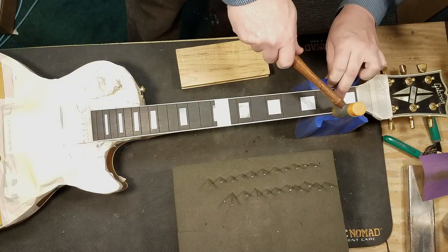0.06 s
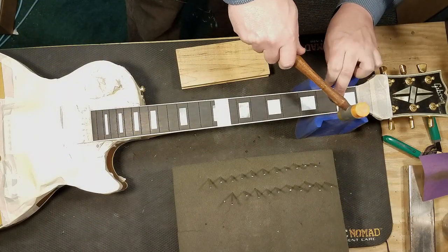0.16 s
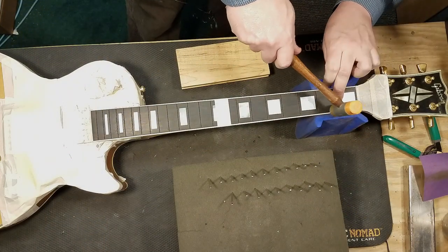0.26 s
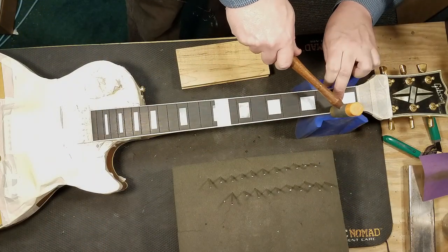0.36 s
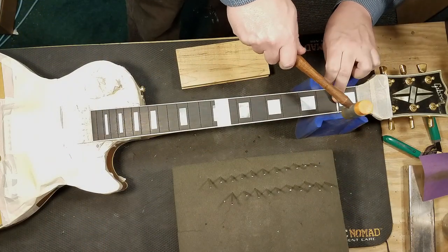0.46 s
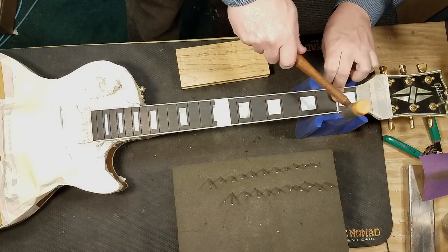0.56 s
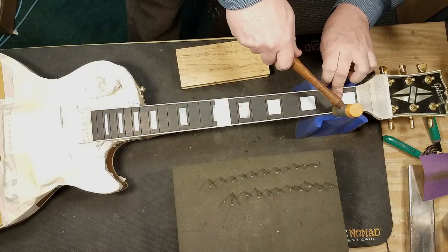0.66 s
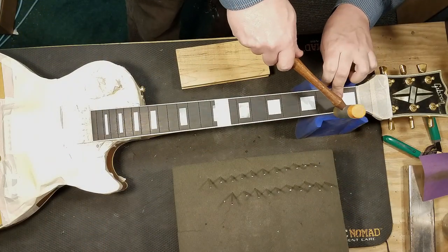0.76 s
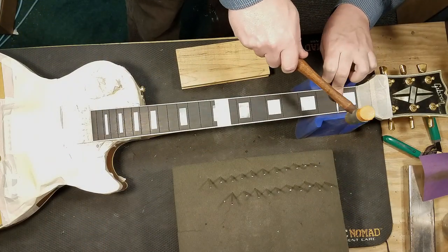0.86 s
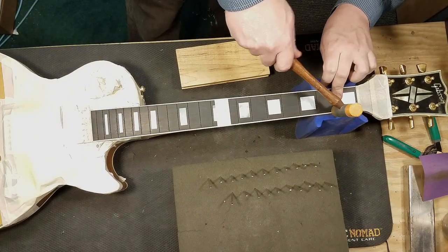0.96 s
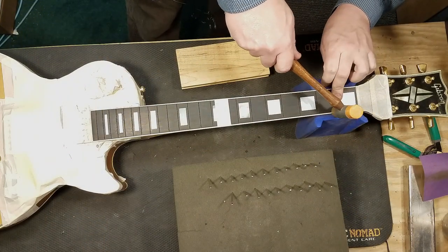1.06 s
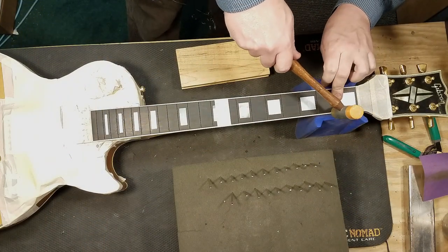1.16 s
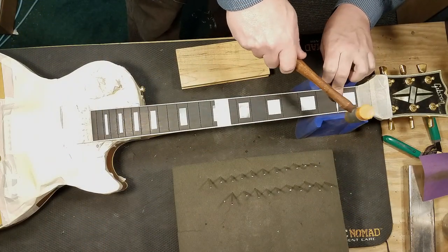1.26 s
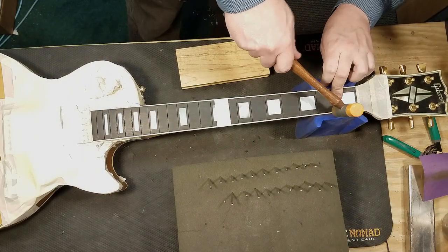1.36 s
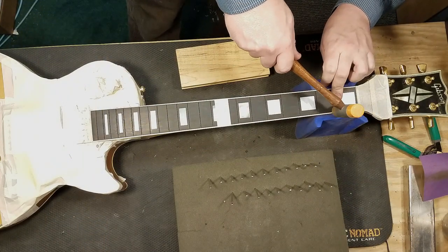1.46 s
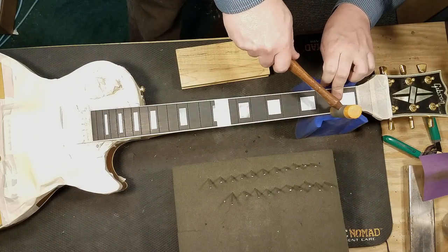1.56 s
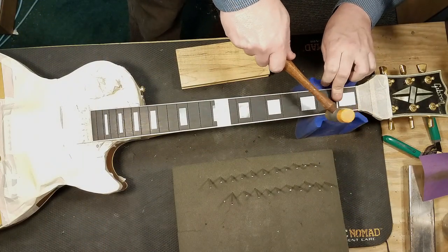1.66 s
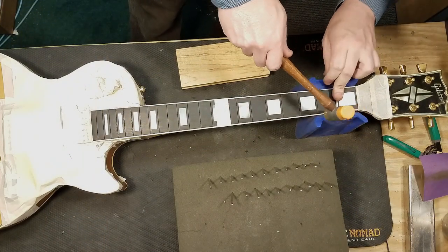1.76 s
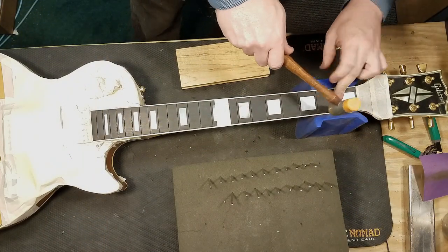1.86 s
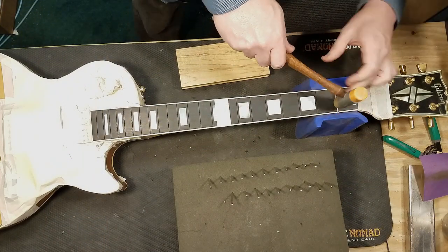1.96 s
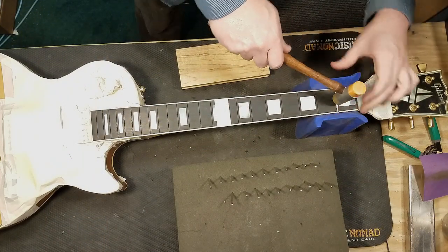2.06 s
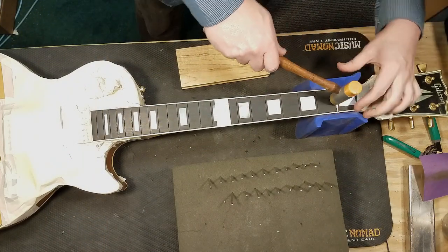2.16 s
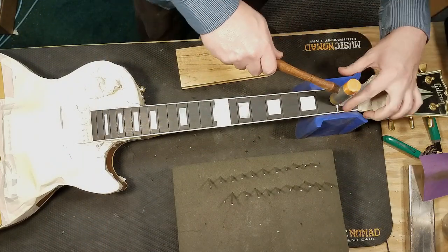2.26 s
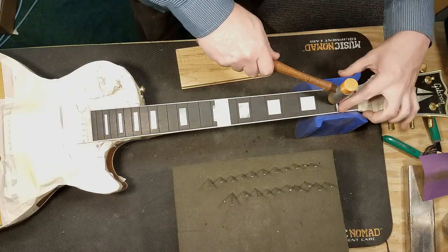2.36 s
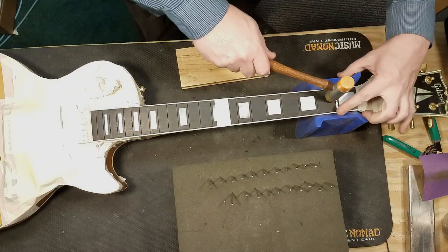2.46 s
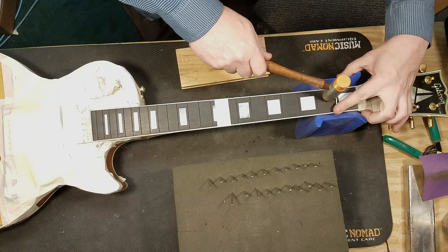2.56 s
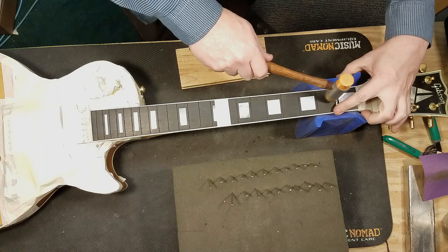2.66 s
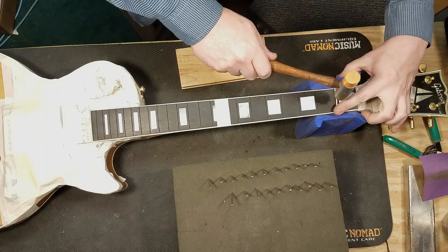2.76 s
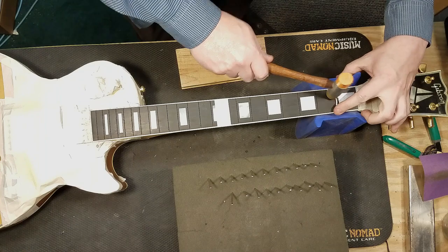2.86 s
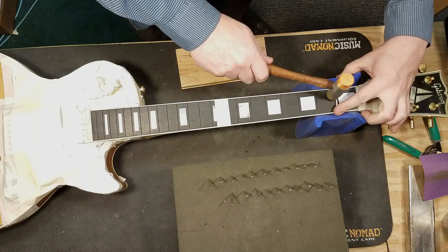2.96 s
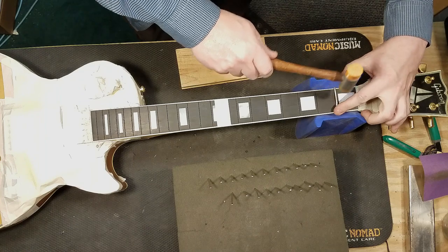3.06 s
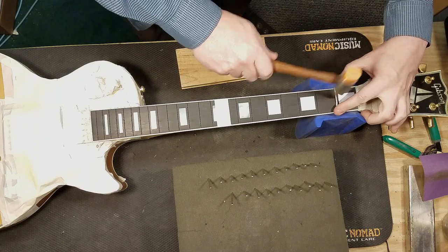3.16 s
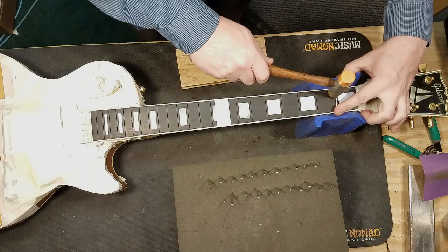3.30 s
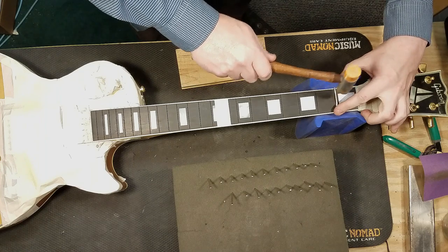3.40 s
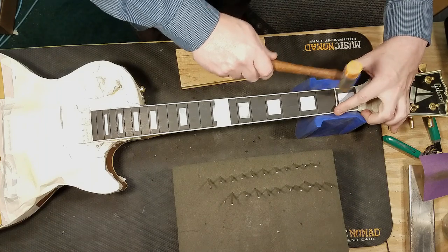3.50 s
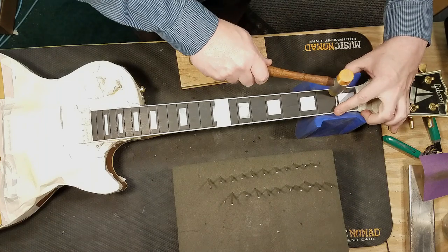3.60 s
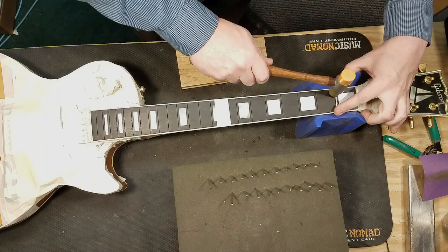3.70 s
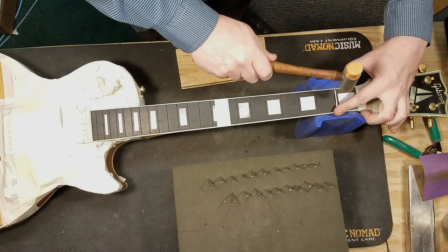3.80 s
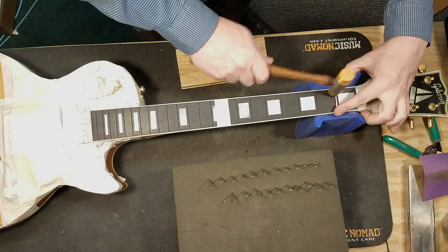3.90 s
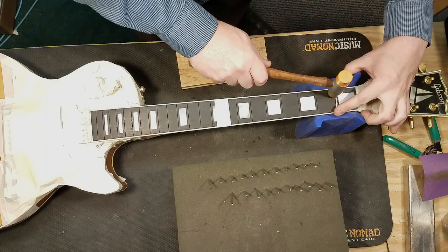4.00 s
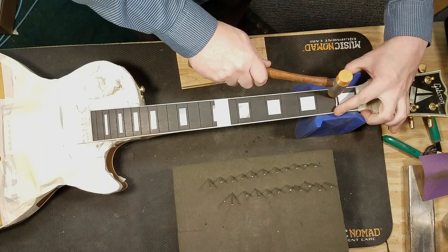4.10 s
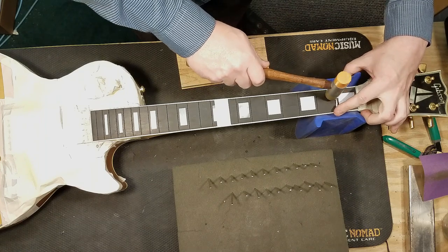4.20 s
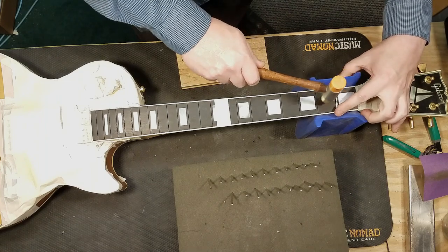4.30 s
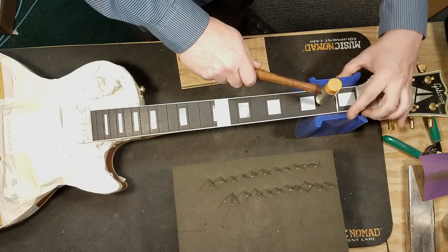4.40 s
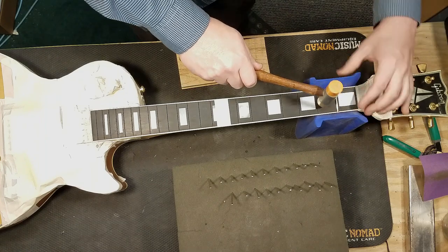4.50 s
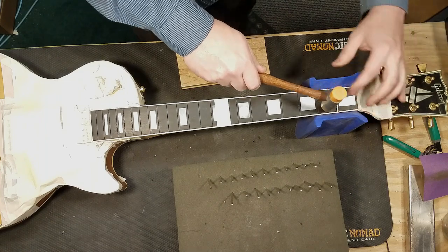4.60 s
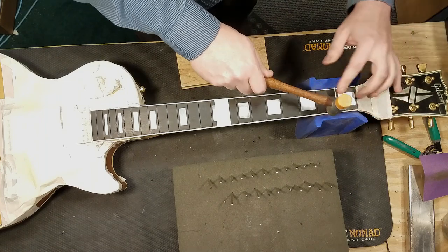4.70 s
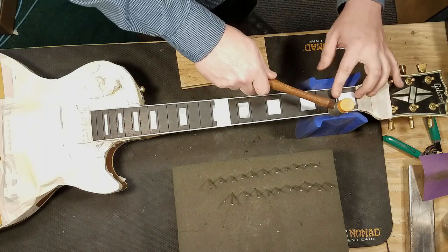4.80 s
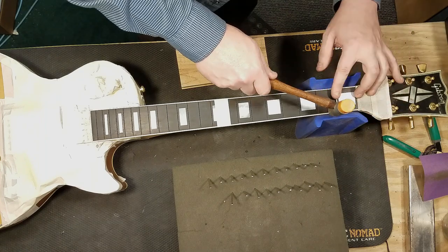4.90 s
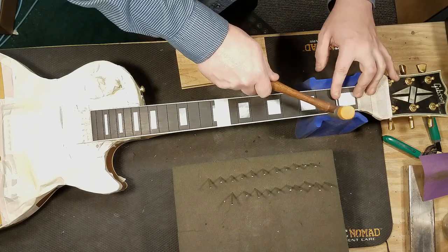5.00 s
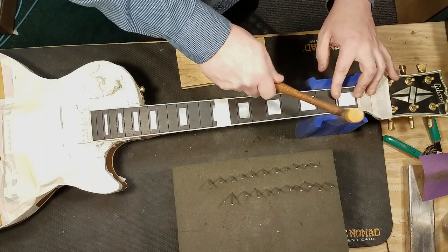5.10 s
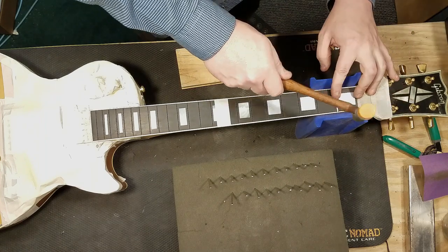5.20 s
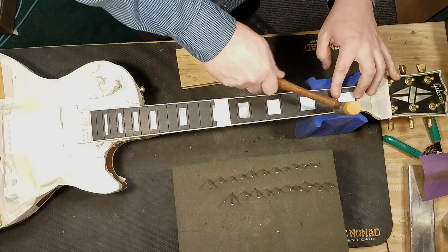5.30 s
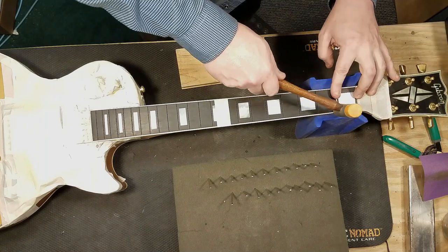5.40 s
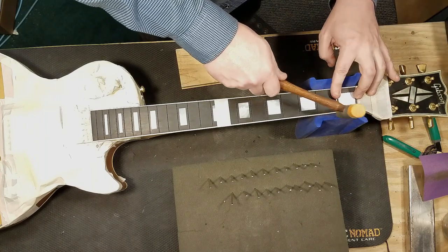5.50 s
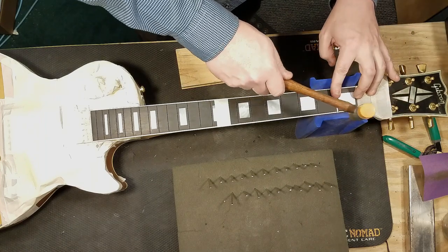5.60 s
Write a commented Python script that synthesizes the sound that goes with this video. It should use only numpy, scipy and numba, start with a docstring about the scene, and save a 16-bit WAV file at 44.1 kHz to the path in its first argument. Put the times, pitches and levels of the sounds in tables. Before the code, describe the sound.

A small brass hammer taps fret wire into a guitar neck, dry woody knocks with metallic ticks in loose runs, in a quiet small workshop.

```python
"""A small, dry workshop, where a small brass hammer taps fret wire into a guitar neck on a padded bench.
Each blow is a noisy tick on the wire, a knock of decaying sine modes in neck and bench, and room echoes of
filtered noise. Between blows come soft bumps and scuffs, made of short noise bands. Behind it all lie
a faint hiss and rumble of shaped noise and a fan's hum of two wavering sines."""
import sys
import numpy as np
from scipy import signal
from scipy.fft import rfft, irfft, next_fast_len
from scipy.io import wavfile
from scipy.ndimage import uniform_filter1d
from numba import njit

SR = 44100
rng = np.random.default_rng(int(sys.argv[2]) if len(sys.argv) > 2 else 0)


def unload_wav(signal):
    """Save mono or channel-first audio to the path in sys.argv[1] as 16-bit WAV at rate SR, clipped to [-1, 1]."""
    wavfile.write(
        sys.argv[1],
        SR,
        np.round(np.clip(np.atleast_2d(signal).T, -1, 1) * 32767).astype(np.int16),
    )


N = 249161  # length in samples

# Colour of the background air. Each row: frequency in Hz, relative spectral level in dB.
AIR_SPECTRUM = [(12, -36.5), (20, -5), (48, -7), (79, -14.5), (113, -9.5), (138, -7), (410, -16),
                (472, -24), (542, -14), (825, -17.5), (1190, -17), (1860, -25.5), (2320, -27), (8410, -48),
                (16000, -63)]
# Broad resonances of the hiss. Each row: centre in Hz, spread to either side in Hz, boost in dB.
AIR_RESONANCES = [(2635, 140, 0.5), (3150, 720, 2), (4580, 210, 5.5)]
# Partials of the fan's hum. Each row: mean frequency in Hz, relative level in dB.
FAN_PARTIALS = [(113., -2.5), (226., -10)]
# Hammer or finger brushing the neck. Each row: start in seconds, level in dB, centre in Hz,
# filter width in Hz, length in seconds (a quarter of the 60 dB decay).
BRUSHES = [(1.8, -70, 8450, 4000, 0.011), (2.01, -69, 9000, 2520, 0.011),
           (2.478, -67.5, 9500, 2500, 0.0087), (4.187, -38.5, 1000, 800, 0.0095),
           (4.2, -36, 1080, 900, 0.011), (4.37, -66.5, 8700, 1500, .006), (4.758, -39, 1180, 800, 0.0061),
           (5.038, -45, 533, 249.3, 0.046)]
# Hammer blows. Each row: start in seconds, level in dB, hardness of the tick in dB,
# spot across the neck from 0 (near edge) to 1 (far edge).
HAMMER_BLOWS = [(0.2992, -2.5, -13.5, 0.093), (0.639, -1, -12.5, 0.059), (1.003, -0.5, -12, 0.1),
                (1.4, -0.5, -12, 0.3), (2.173, -16, -17.5, 0.32), (2.609, -11, -31.5, 0.99),
                (2.903, -0.97, -20.5, 0.9), (3.222, 0.56, -19.5, 0.82), (3.5654, 1.4, -18, 0.77),
                (3.939, 1.14, -17.5, 0.97), (4.8383, -15.5, -16, 0.85), (5.335, 1.5, -17.5, 0.58)]
# Modes of neck and bench. Each row: nominal frequency in Hz, relative level in dB when struck at the near edge,
# relative level in dB when struck at the far edge, 60 dB decay in seconds.
NECK_MODES = [(44.3, -15.5, -26.5, 0.57), (74.9, -15.5, -21.5, 0.43), (104.4, -6, -1.5, 0.31),
              (129.6, -16, -11, 0.39), (168.3, -10.5, -3, 0.25), (278.2, -11, -22.5, 0.4),
              (350.4, -8, -17.5, 0.3), (377.7, -6.5, -5, 0.24), (500, -15, -22, 0.37),
              (546.3, -5, -0.5, 0.2), (573.4, 3.5, -12.5, 0.2), (599, 9.5, 3.5, 0.027),
              (635, -12, -5.5, 0.097), (765, -3, -10, 0.27), (784, -20, -1, 0.28), (817, 7.5, 7.5, 0.017),
              (835.3, -3.5, -0.5, 0.25), (849, -8, -1.5, 0.075), (968, 11.5, 8.5, 0.021),
              (965, 3.5, -4, 0.18), (1066, 1, 3, 0.13), (1087, -23.5, -2.5, 0.21),
              (1206.5, -7.5, -2.5, 0.21), (1247, -8, 9.5, 0.068), (1303.6, -4, 10, 0.074),
              (1362.5, -18, 2, .18), (1401, -10.5, -0.5, 0.19), (1470, -20.5, -18, 0.31),
              (1650, -14, -19.5, 0.25), (1906, -6, -21, 0.091)]
# Resonances of brass on wire. Each row: centre in Hz, filter width in Hz, relative level in dB.
WIRE_RESONANCES = [(1878, 1300, -1.5), (2479, 850, 11), (3100, 490, 12.5), (4130, 1400, 10.5),
                   (5690, 1080, 3), (7040, 2900, 0), (11600, 4600, -19)]
# First echoes of thud and tick. Each row: delay in seconds from the near edge,
# delay in seconds from the far edge, level in dB.
FIRST_ECHOES = [(.0021, .003, -5.5), (.0062, .0085, -33.5), (0.015, .017, -16)]
# The room's wash of echoes. Each row: band centre in Hz, relative level in dB, 60 dB decay in seconds.
ROOM_BANDS = [(65.6, -24.5, 0.32), (131.5, -24, 0.3), (273.6, -23.5, 0.39), (555.3, -16.5, 0.26),
              (835, -12.5, 0.22), (1316, -20, 0.16), (1960, -27, 0.11), (2695, -30, 0.098),
              (4390, -35.5, 0.13), (6770, -35.5, 0.081), (10020, -47, 0.074), (13920, -52, 0.078)]

AIR_START_DB, AIR_END_DB, AIR_SETTLE_S = -23.5, -29, 1.8  # the hiss sinks and settles
RUMBLE_SWELL_DB = 2
FAN_DB, FAN_SWELL_DB = -59.5, 2
BENCH_NEAR_DB, BENCH_FAR_DB = 5, -6  # the bench thumps most when the near edge is struck
THUD_NEAR_DB, THUD_FAR_DB, THUD_PER_DB = 2, -2, -0.6  # more thud at the near edge and in a light blow
ROOM_DB, ROOM_PER_DB = 1, 0.1  # a light blow sounds drier
SHARED_WASH = 0.9  # part of the echo noise that repeats from blow to blow
DEAD_T60_S = 0.07  # modes that die faster than this make the thud
TOP_HZ = 16200  # upper edge of the sound


def undb(db):
    """Decibels to gain."""
    return 10 ** (np.asarray(db) / 20)


def band(x, hz, width):
    """Resonant band-pass, gain 1 at the centre."""
    return signal.lfilter(*signal.iirpeak(min(hz, SR / 2.2), hz / width, fs=SR), x)


def unit(x):
    """Scales to rms 1."""
    return x / np.sqrt(np.mean(x ** 2))


def fade(t, t60, rise):
    """Swells over rise seconds and dies by 60 dB in t60."""
    return (1 - np.exp(-t / rise)) * np.exp(-np.log(1000) * t / t60)


def add(out, x, s):
    """Mixes x into out from time s."""
    i = int(s * SR)
    out[i:i + len(x)] += x[:N - i]


def walk(rate):
    """Random drift: levels held 1 / rate seconds and slewed twice."""
    k = int(SR / rate)
    steps = np.repeat(rng.standard_normal(N // k + 1), k)
    return uniform_filter1d(uniform_filter1d(steps, k), k)[:N]


def air():
    """Hiss and rumble: shaped noise in crossfaded half-octave bands that each flicker a little."""
    size = next_fast_len(N)
    t = np.arange(N) / SR
    f = np.arange(size // 2 + 1) * SR / size + 1  # 1 Hz up, to keep the logarithm finite
    hz, db = np.transpose(AIR_SPECTRUM)
    colour_db = np.interp(np.log(f), np.log(hz), db)
    for centre, spread, boost_db in AIR_RESONANCES:
        colour_db = colour_db + boost_db * np.exp(-((f - centre) / spread) ** 2)
    noise = rfft(rng.standard_normal(size)) * undb(colour_db)
    rumble_db = RUMBLE_SWELL_DB * walk(1.5)
    out = 0
    for octave in np.arange(4, 14.5, .5):
        share = np.clip(1 - 2 * abs(np.log2(f) - octave), 0, 1)
        swell_db = rumble_db / (1 + (2 ** octave / 450) ** 2)  # the lows swell together
        flicker_db = 1.9 * walk(4.035)
        out = out + undb(flicker_db + swell_db) * irfft(noise * share, size)[:N]
    level_db = AIR_END_DB + (AIR_START_DB - AIR_END_DB) * np.exp(-t / AIR_SETTLE_S)
    return out * undb(level_db)


def fan():
    """The fan's hum: sines whose pitch and level waver at random."""
    hum = 0
    for hz, db in FAN_PARTIALS:
        level = np.sqrt(2) * undb(db + 4 * walk(9))
        phase = 2 * np.pi * np.cumsum(hz + 3 * walk(6)) / SR
        hum = hum + level * np.sin(phase)
    return hum * undb(FAN_DB + FAN_SWELL_DB * walk(2.7))


def touches():
    """Soft bumps on the wood and faint scuffs of skin and sleeve, as short swells of band-passed noise."""
    out, t = np.zeros(N), np.arange(SR // 4) / SR
    for s, db, hz, width, length in BRUSHES:
        grain = band(rng.standard_normal(len(t)), hz, width)
        grain = unit(band(grain, hz, width))
        swell = fade(t, 4 * length, 0.18 * length) * grain
        add(out, undb(db) * band(swell, hz, 2 * width), s)
    return out


def wash(t, noise):
    """Dense room echoes, each band with its own decay; the lows build up last."""
    out = 0
    for hz, db, t60 in ROOM_BANDS:
        width = 0.59 * hz
        grain = unit(band(band(noise, hz, width), hz, width))
        out = out + undb(db) * fade(t, t60, 0.00063 + 0.5 / hz) * grain
    return out


def early(x, spot):
    """The first echoes, from bench top, guitar body and wall, timed by the spot struck."""
    out = np.zeros(len(x))
    for near_s, far_s, db in FIRST_ECHOES:
        add(out, undb(db) * x[:len(x) // 2], near_s + spot * (far_s - near_s))
    return out


def knock(t, spot, bench_db, wobble):
    """Modes of neck and bench, one row each: the spot sets their balance, long or low ringing builds up slowly."""
    hz, near_db, far_db, t60 = np.transpose(NECK_MODES)[:, :, None]
    db = near_db + spot * (far_db - near_db)
    db = db + 0.9 * wobble[:, :1]  # no two blows excite the modes alike
    db = db + bench_db / (1 + (hz / 250) ** 4)  # the bench acts on the lows
    rise = 0.022 * t60 + (7.7 / hz) ** 2
    hz = hz * (1 + .003 * wobble[:, 1:])
    return undb(db) * fade(t, t60, rise) * np.sin(2 * np.pi * hz * t)


def tick(t, tick_db):
    """An instant contact and a short rattle of the wire; a softer contact loses the treble first."""
    rattle = rng.standard_normal(len(t)) * np.exp(-t / 0.0026) * undb(-4.5)
    rattle[0] += 2  # the contact itself
    out = 0
    for hz, width, db in WIRE_RESONANCES:
        hardness_db = (tick_db + 19.0) * min(hz / 4500, 1)
        ring = band(band(rattle, hz, width), hz, 2 * width)
        out = out + undb(db - 23.5 + hardness_db) * ring
    return out


def hammer():
    """Blows of tick, thud, ring and echoes; the walls stay put, so most of the wash repeats."""
    out, t = np.zeros(N), np.arange(SR * 2 // 5) / SR
    walls = rng.standard_normal(len(t))
    dead = np.transpose(NECK_MODES)[3] < DEAD_T60_S
    for s, db, tick_db, spot in HAMMER_BLOWS:
        bench_db = BENCH_NEAR_DB + spot * (BENCH_FAR_DB - BENCH_NEAR_DB)
        thud_db = THUD_NEAR_DB + spot * (THUD_FAR_DB - THUD_NEAR_DB) + THUD_PER_DB * db
        fresh = rng.standard_normal(len(t))
        echoes = wash(t, SHARED_WASH * walls + np.sqrt(1 - SHARED_WASH ** 2) * fresh)
        # a harder contact and a heavier blow brighten the echoes
        bright = signal.lfilter(*signal.butter(2, 3300, "high", fs=SR), echoes)
        bright_db = 0.71 * (tick_db + 24) + 0.31 * db
        echoes = echoes + (undb(bright_db) - 1) * bright
        modes = undb(-15) * knock(t, spot, bench_db, rng.standard_normal((len(NECK_MODES), 2)))
        # the heavily damped modes make the first thud, the others ring on
        thud = undb(thud_db) * modes[dead].sum(axis=0)
        ring = modes[~dead].sum(axis=0)
        click = undb(11.5) * tick(t, tick_db)
        # the padded bench returns the thud better than the tick
        attack = thud + click + early(thud + undb(-26.5) * click, spot)
        room = undb(ROOM_DB + ROOM_PER_DB * db) * echoes
        add(out, undb(db) * (attack + ring + room), s)
    return out


def scene():
    """Background, touches and hammer at one microphone."""
    return (air() + fan() + touches() + hammer())[None]


@njit
def limit(x, top, slope, attack, release):
    """Gain control: follows the peaks fast, lets go slowly."""
    y, e = np.empty(len(x)), 0.
    for i in range(len(x)):
        e += (abs(x[i]) - e) * (attack if abs(x[i]) > e else release)
        y[i] = x[i] * (top / max(e, top)) ** slope
    return y


def record(dry):
    """A limiter holds down hard blows, so their echoes seem longer; the capsule dulls the top."""
    attack_s, release_s = 0.007, 0.036
    held = limit(dry[0], undb(-6.5), .45, 1 / (attack_s * SR), 1 / (release_s * SR))
    ceiling = 1.25
    rounded = ceiling * np.tanh(held / ceiling)  # soft clipping
    dulled = signal.lfilter(*signal.butter(2, 14500, fs=SR), rounded)
    steep = signal.ellip(12, .2, 95, TOP_HZ, fs=SR, output="sos")
    return signal.sosfilt(steep, dulled)[None]


dry = scene()
out = record(dry)
unload_wav(out)
```